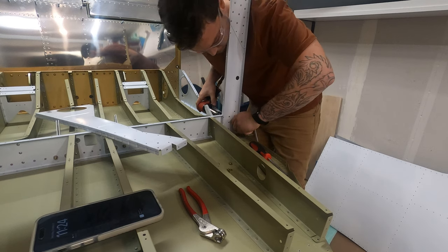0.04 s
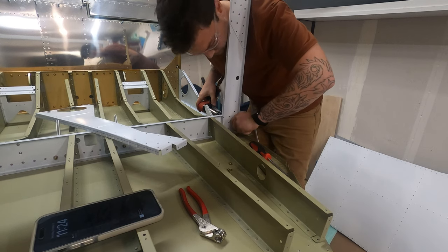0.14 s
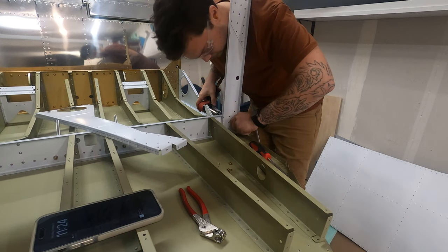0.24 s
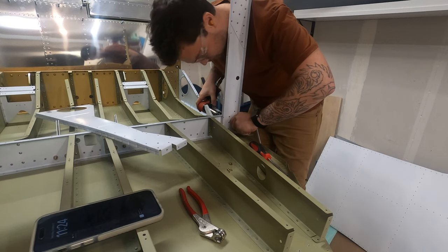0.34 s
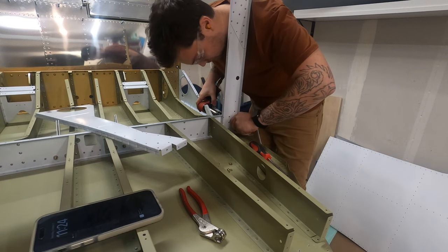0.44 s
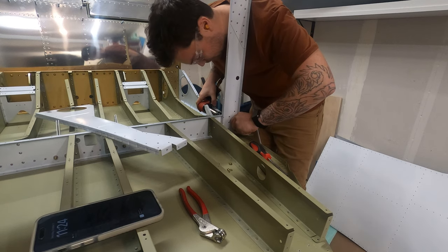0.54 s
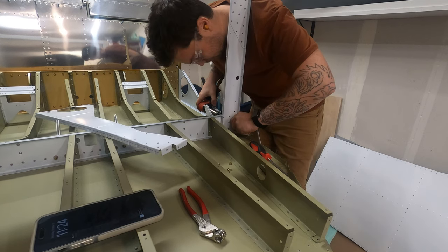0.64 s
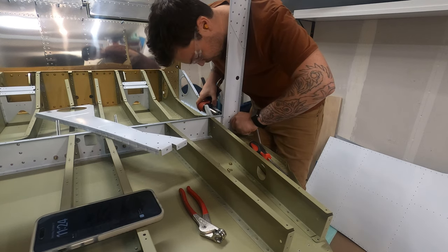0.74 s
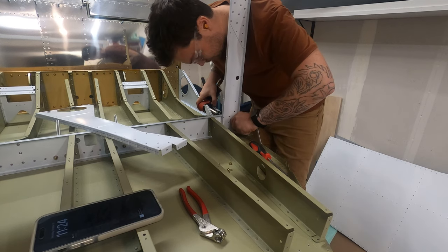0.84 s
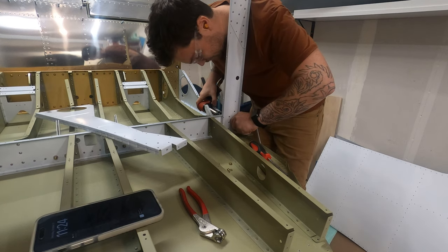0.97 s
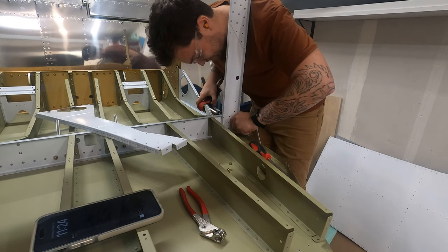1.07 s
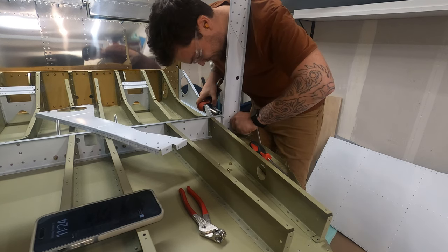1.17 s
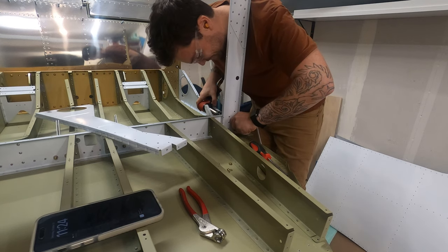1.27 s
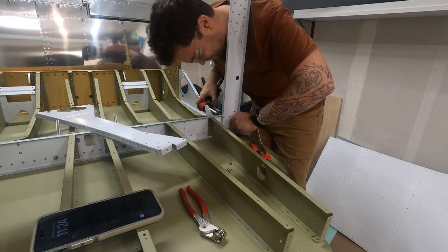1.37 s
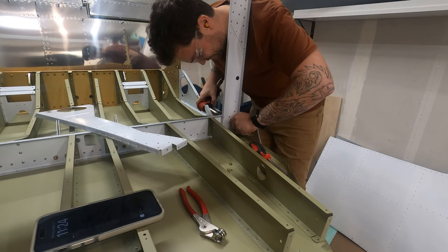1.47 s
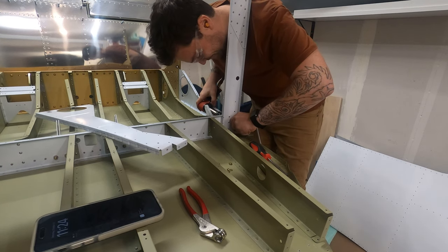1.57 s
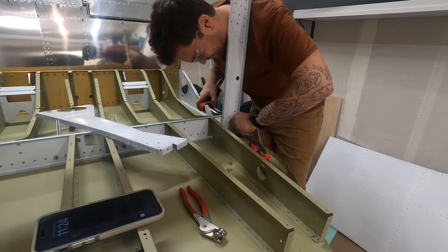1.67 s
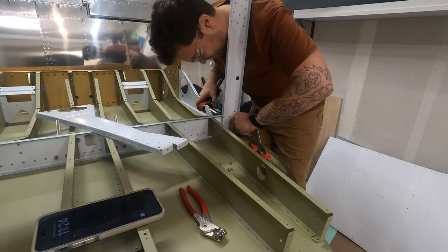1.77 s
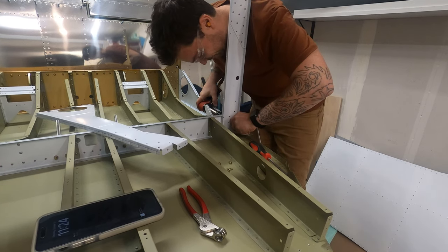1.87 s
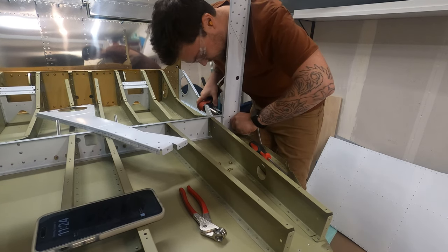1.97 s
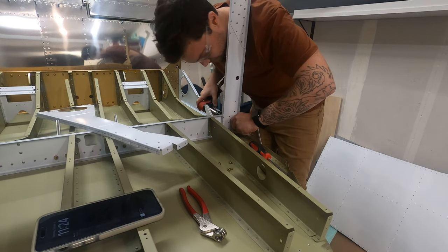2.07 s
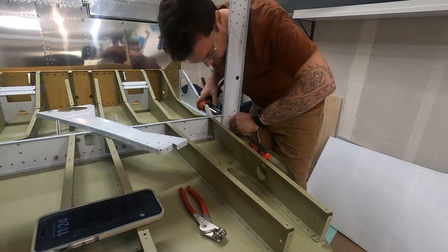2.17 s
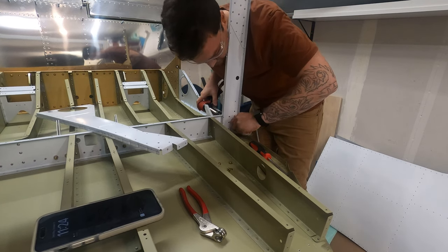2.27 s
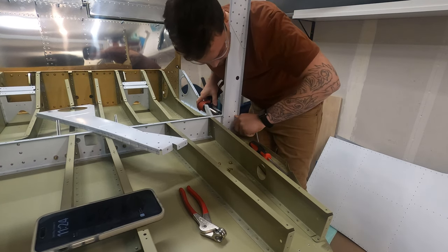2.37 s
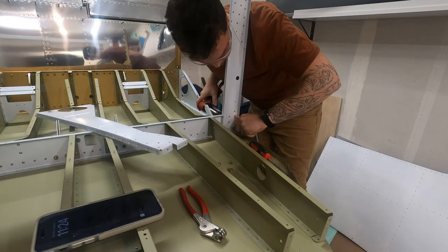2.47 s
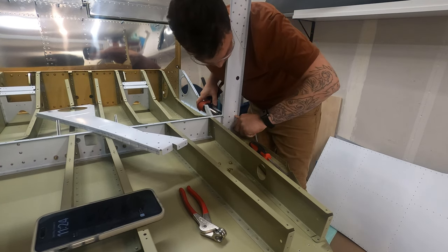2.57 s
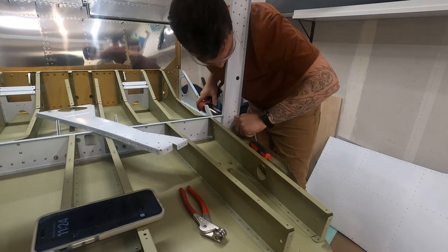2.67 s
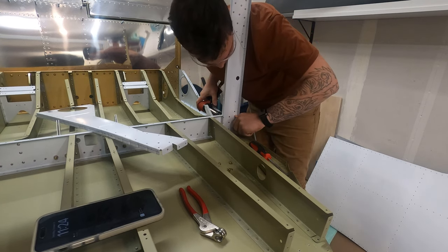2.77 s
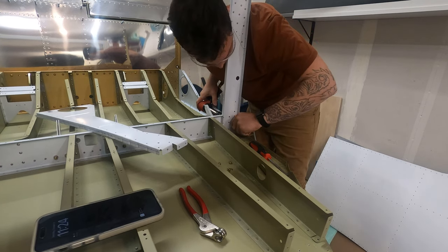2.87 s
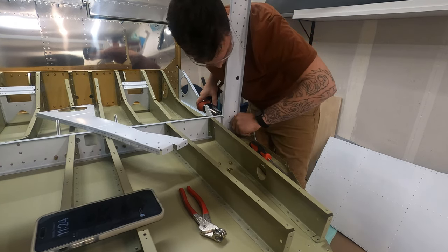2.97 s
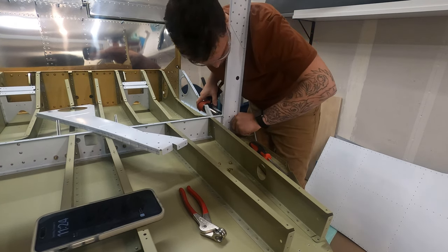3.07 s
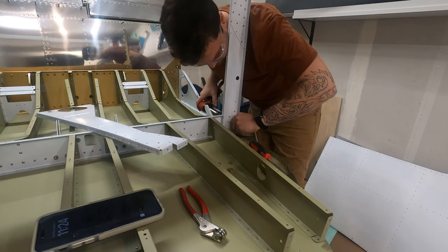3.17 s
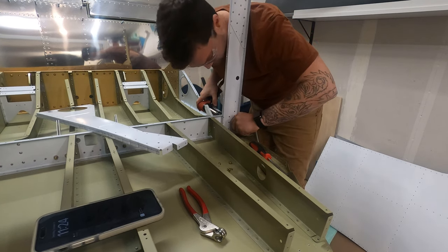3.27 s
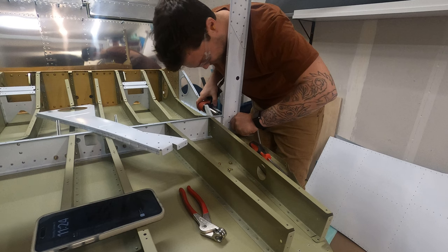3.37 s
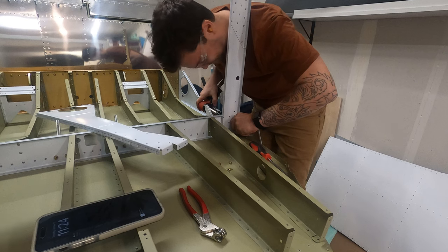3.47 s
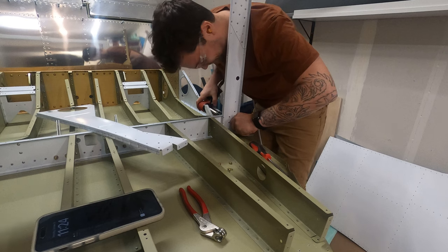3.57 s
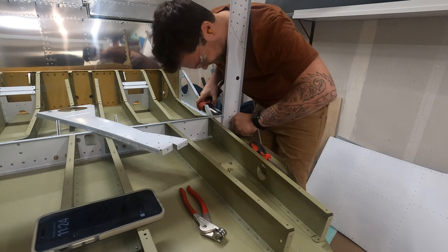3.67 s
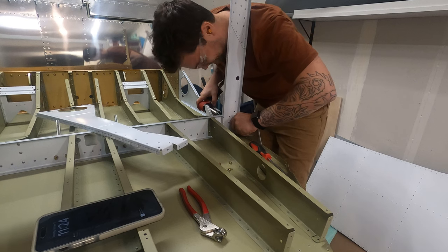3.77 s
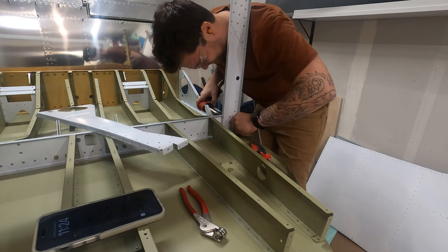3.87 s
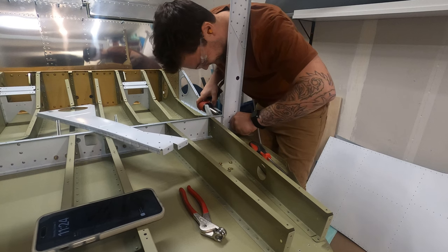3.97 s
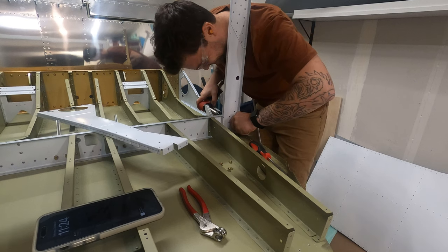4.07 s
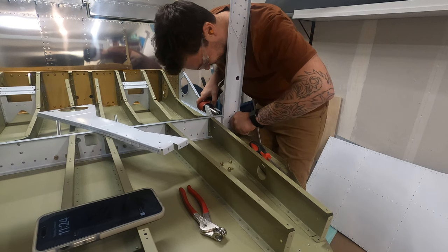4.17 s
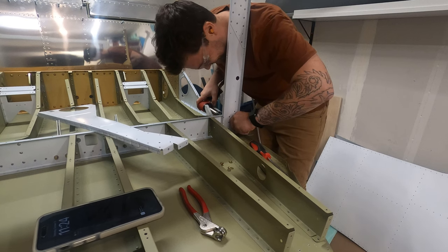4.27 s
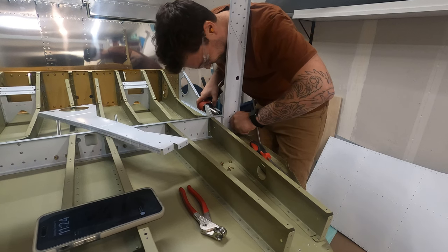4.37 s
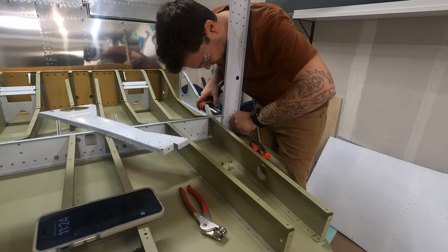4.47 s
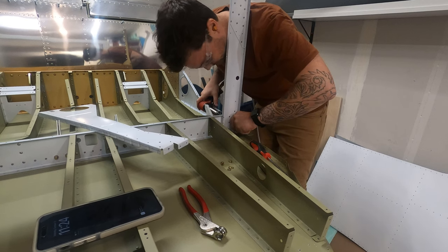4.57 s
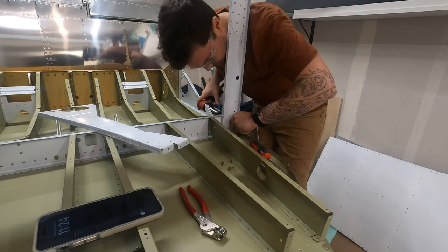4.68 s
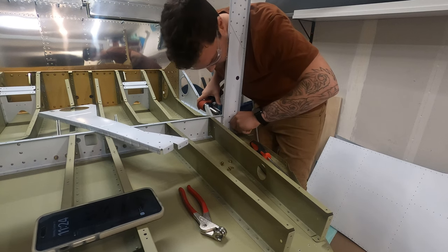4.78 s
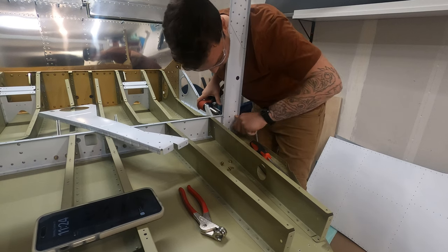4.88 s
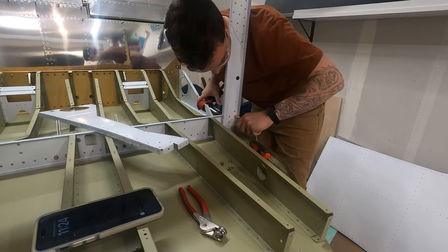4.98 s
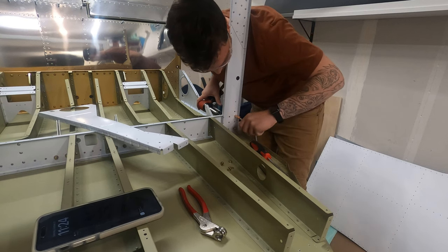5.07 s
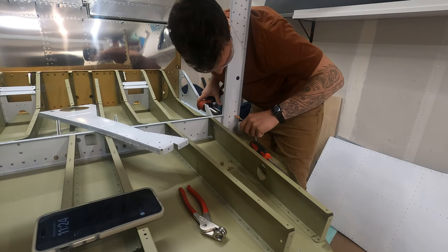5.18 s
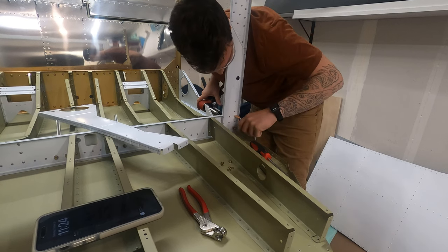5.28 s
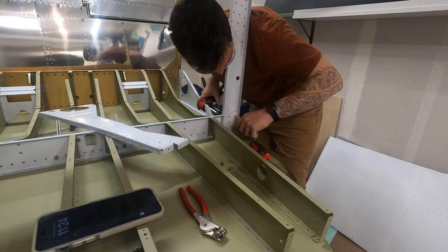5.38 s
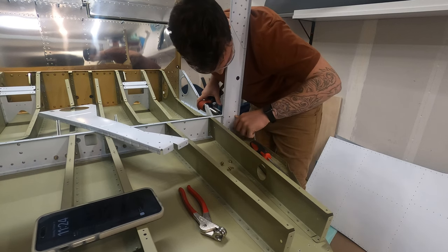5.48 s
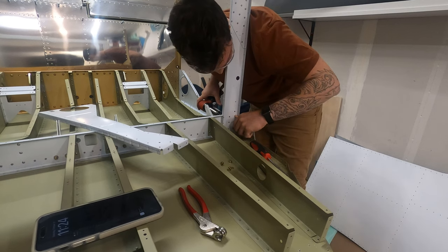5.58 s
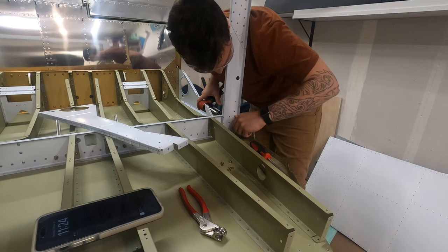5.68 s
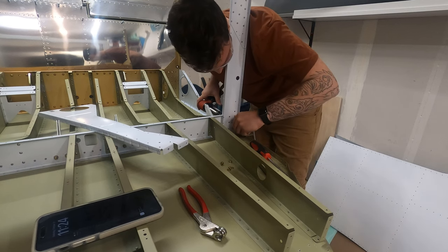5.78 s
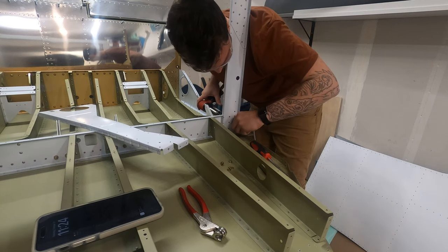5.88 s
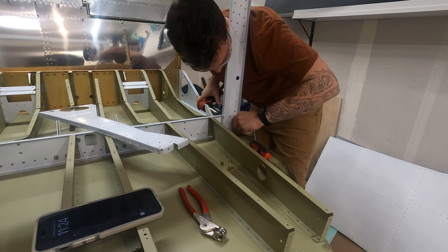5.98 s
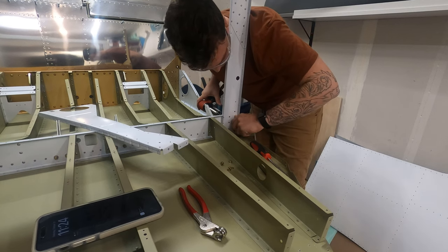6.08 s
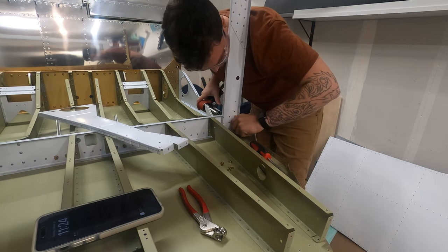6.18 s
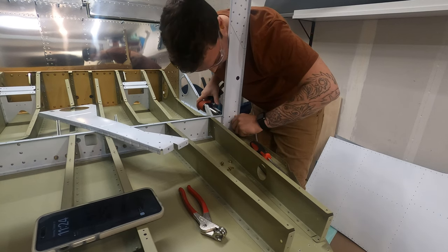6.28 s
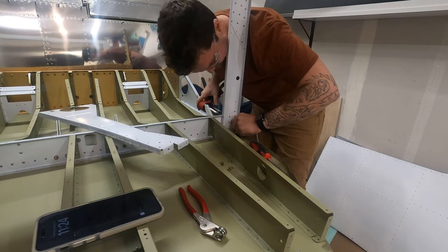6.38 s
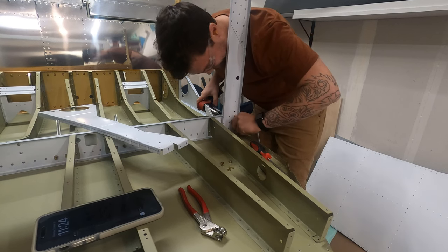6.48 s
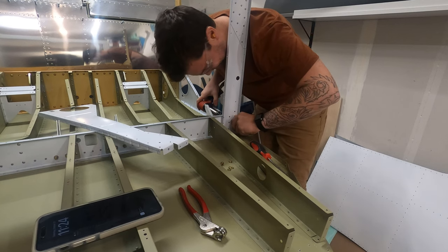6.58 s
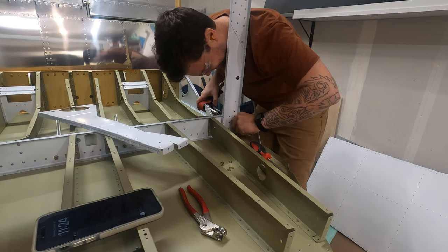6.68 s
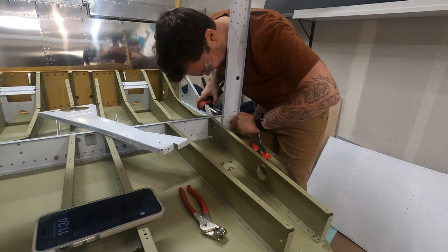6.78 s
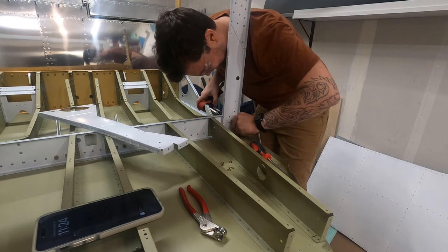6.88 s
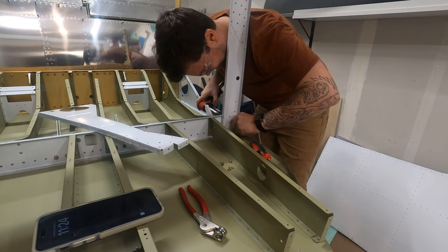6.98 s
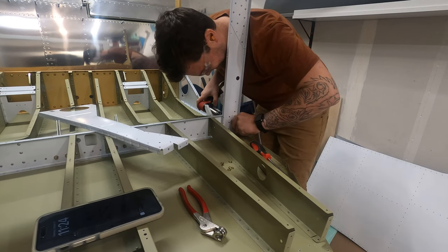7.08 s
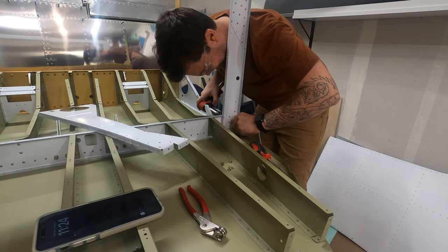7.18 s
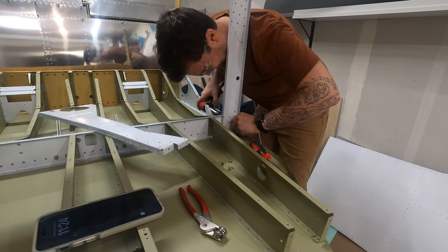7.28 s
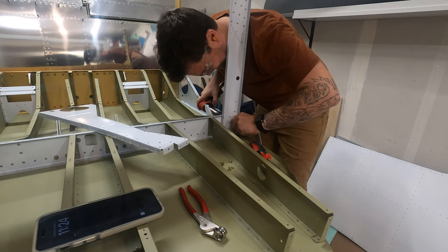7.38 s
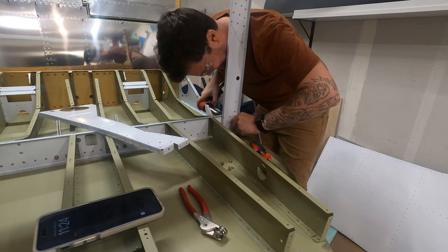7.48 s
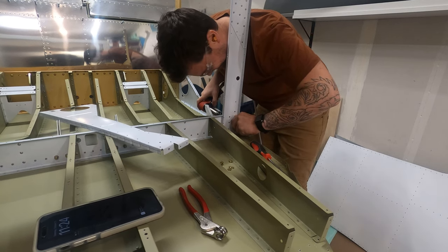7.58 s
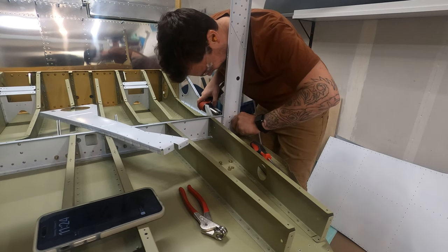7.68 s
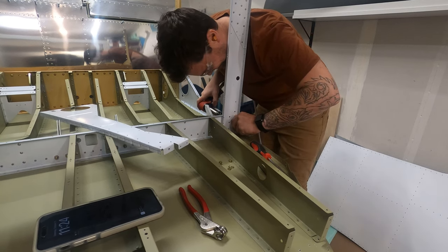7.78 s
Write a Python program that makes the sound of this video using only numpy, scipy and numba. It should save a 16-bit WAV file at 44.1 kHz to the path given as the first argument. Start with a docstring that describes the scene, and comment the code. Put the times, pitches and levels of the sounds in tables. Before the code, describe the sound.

In a small, quiet workshop, faint tool taps and scraping on sheet metal lead to a short, violent burst from a pneumatic rivet gun. A sharp clank and rattle follow, then a longer burst, its ring fading slowly. More light scrapes and clanks come before a whistling air leak swells into a third burst. Close stereo microphone, with the loud blows compressed and the ring swelling back.

```python
"""Rivet gun on an aluminium airframe

A pneumatic rivet gun hammers a ringing shell in three short bursts in a small workshop.
Around the bursts, gun and bucking bar slide, bump and land on the metal: each contact is a force
that is convolved with the shell's impulse response. Shaped noise makes the room and the inlet air hiss
before each burst, narrow resonances a whistle before the last. The gun's beat slows a little in a burst.
A limiter holds the bursts down and lets their ring swell back up."""
import sys
import numpy as np
from scipy import signal
from scipy.fft import rfft, irfft
from scipy.io import wavfile
from scipy.ndimage import uniform_filter1d
from numba import njit

SR = 44100
rng = np.random.default_rng(int(sys.argv[2]) if len(sys.argv) > 2 else 0)


def dump(signal):
    """Clip the signal to [-1, 1] and save it as 16-bit WAV at the path in sys.argv[1]."""
    limited = np.clip(np.atleast_2d(signal).T, -1, 1)
    pcm = np.round(limited * 32767).astype(np.int16)
    wavfile.write(sys.argv[1], SR, pcm)


N = 345726
RING_N, BLOW_N = 2 * SR, 2048  # samples of an impulse response and of a single contact

# Spectrum of the still workshop. Each row: frequency in Hz, relative density in dB per Hz.
SHOP_COLOUR = [(70, -6), (100, -11.5), (165, 1.5), (240, -5), (330, -11), (700, -17), (1500, -16),
               (2200, -23.5), (3500, -36), (6000, -41.5), (10000, -52), (15000, -75)]
# Ratio of side to mid, which widens the sound in the treble. Each row: frequency in Hz, side minus mid in dB.
WIDTH = [(60, -8), (200, -14), (700, -11), (1300, -8.5), (2400, -6), (4400, -3), (8100, -1.5), (15000, -1)]
# Scaling of the stereo difference over time. Each row: time in seconds, side gain in dB.
SPREAD = [(4.0, 0.5), (4.5, -12.5), (4.897, -37), (6.6, -49.5), (7.05, -12.5)]

# Resonances of the leaking valve before they bend. Each row: frequency in Hz, relative level in dB.
WHISTLE_TONES = [(900, 16.5), (2640, 8), (5590, 1)]
WHISTLE_S, WHISTLE_RISE_S = 0.45, 0.29  # start ahead of the last burst, time constant of its build-up
WHISTLE_BEND, WHISTLE_BEND_S = 0.203, 0.0308  # upward bend as a share of pitch, its e-fold time
AIR_RISE_S, AIR_CUT_S = 0.01, .003  # e-fold times of inlet air before and after the first blow

# Tools sliding on the metal.
# Each row: start in seconds, end in seconds, relative level in dB, contact resonance in Hz.
SCRAPES = [(0, 0.337, -56, 3120), (2.366, 2.429, -62, 2993), (2.614, 2.659, -57.5, 2610),
           (2.878, 3.02, -70.5, 4000), (5.635, 5.951, -61.5, 4990), (5.956, 6.123, -56, 11580),
           (6.216, 6.264, -41.5, 7240), (6.381, 6.65, -57.5, 4520), (6.635, 6.697, -58.5, 7450)]
# Soft bumps against the panels. Each row: time in seconds, level in dB, contact resonance in Hz.
BUMPS = [(0.5, -52.5, 162.9), (0.532, -52, 210), (0.62, -53.5, 260), (.852, -36.5, 238), (.878, -47, 272),
         (0.953, -46.5, 239), (1.529, -49, 250), (1.6, -29.5, 272), (3.497, -43, 264), (5.04, -40, 272.6),
         (5.169, -44.5, 240), (6.65, -41.5, 500), (6.655, -47.5, 344), (6.744, -58, 352)]
BUMP_Q, BUMP_BASS_DB = 3.3, -0.5
# Light clicks of steel on aluminium. Each row: time in seconds, level in dB, contact resonance in Hz.
CLICKS = [(3.483, -61, 3500), (5.251, -63, 5000), (5.944, -46, 5000)]
# Trigger valve inside the gun. Each row: time in seconds, level in dB, contact resonance in Hz.
CLACKS = [(1.599, -15.5, 11000), (1.607, -20.5, 2400), (3.844, -35.5, 11000), (3.866, -30.5, 3200)]
CLICK_Q, CLICK_BASS_DB, CLICK_LOW_HZ = 0.59, -21.5, 824
# Gun and bar set down on the shell. Each row: time in seconds, level in dB, contact resonance in Hz,
# bass in dB, share of the bar's ring against the ribs' from 0 to 1.
CLANKS = [(.004, -50.5, 3250, 8.5, 0.65), (.162, -42.5, 3700, -1.5, 1), (2.416, -56, 3300, 3.5, 0.98),
          (2.628, -57.5, 2886, -2, 0.6), (3.022, -25, 3400, -1, .1), (3.072, -35.5, 1300, 0.5, .1),
          (3.128, -39, 1100, 2.5, 0.12), (5.631, -61, 3185, 5.5, .8), (5.971, -23, 2300, 6, 0),
          (6.209, -40, 2630, 8.5, 0.5), (6.238, -39.5, 4170, 12, 0.53), (6.254, -45, 5500, 10.5, 0.5),
          (6.648, -46.5, 4500, -4.5, .95)]
CLANK_Q = 0.64
# Mean lag between landings, level of the second landing, step to each later one, their lower limit.
TIP_S, TIP_DB, RATTLE_STEP_DB, RATTLE_LOW_HZ = .010, -6.5, -8, 453

# Resonances of the hand-held bucking bar and gaps between them.
# Each row: frequency in Hz, width in Hz, gain in dB.
BAR = [(1190, 100, 4), (1500, 90, 2), (1770, 120, 7), (2020, 200, -8), (2260, 80, 3), (2430, 150, -5),
       (2720, 200, 4), (3650, 120, 4), (3970, 130, 2), (5730, 200, -6), (6150, 220, 7), (8900, 300, 6)]
# Resonances and a gap of the gun's body. Each row: frequency in Hz, width in Hz, gain in dB.
GUN_BODY = [(1151, 80, 9.5), (1750, 420, 5), (3000, 61, 4), (4900, 2500, -6), (5850, 120, 3.5)]
# Clusters of modes in the riveted metal and gaps between them.
# Each row: frequency in Hz, width in Hz, gain in dB.
METAL_PEAKS = [(176, 22, 4), (205, 20, -3), (330, 40, -5), (635, 60, -3), (715, 40, 5), (812, 35, 4),
               (865, 60, -6), (970, 80, 3), (1165, 90, 4), (1510, 70, 3), (1980, 130, 3), (2420, 100, -4),
               (2660, 70, -5), (2760, 140, 3), (3140, 100, 3), (3910, 90, 4), (5730, 120, 6),
               (6600, 130, 6), (6980, 110, 5), (8050, 450, -8), (8540, 200, 6), (8950, 200, 4),
               (11100, 600, -4)]
# Panel modes of the shell. Each row: frequency in Hz, level in dB, T60 in seconds.
SHELL_MODES = [(101.1, -41, 1.8), (130, -19.5, 0.52), (162.5, -18, 1.1), (175.3, -9, 0.44),
               (236.1, -13.5, 0.8), (283.4, -12, 0.56), (383, -21, .5), (424, -26, .35), (718, -18, 0.5),
               (812, -22, .45), (1160, -19.5, .35)]
# Modes of the ribs that the tools land on. Each row: frequency in Hz, level in dB, T60 in seconds.
RIB_MODES = [(619, -17, .55), (730, -13, .42), (896, -13, .4), (1040, -17, .3), (1503, -13, .33),
             (1850, -16, .25), (2000, -16, .25), (2155, -13, .33), (2335, -7, .28), (2400, -13, .2),
             (2590, -18, .28), (2920, -18, .3), (3330, -17, .35)]
# Rivet set and bucking bar ringing against each other.
# Each row: frequency in Hz, relative level in dB, T60 in seconds.
STEEL_MODES = [(980, -23, .2), (1158, -21, .2), (1513, -21, .2), (1715, -22, .15), (1950, -20, .15),
               (2019, -19, .2), (2285, -20, .15), (2560, -19, .2), (2725, -19, .2), (3160, -18, .12),
               (3420, -18, .12), (3925, -21, .15), (5105, -27, .15), (6622, -24, .15)]
# Close pair of modes that outlasts the rest. Each row: frequency in Hz, level gained per blow in dB.
AFTER_TONE = [(738, -78), (742.8, -70)]
AFTER_T60_S = 4.6
# Spectrum of the dense ring of shell and room. Each row: frequency in Hz, relative density in dB per Hz.
RING_COLOUR = [(40, -35), (90, -4.5), (170, 6), (300, 3), (500, -3.5), (1100, -7.5), (2200, -6.5),
               (3500, -9), (6000, -16.5), (9500, -20.5), (11000, -23), (16000, -33.5)]
# Decay of that ring. Each row: frequency in Hz, T60 in seconds.
RING_T60 = [(100, 0.69), (300, 0.68), (1000, 0.58), (3000, 0.49), (7000, 0.43), (15000, 0.35)]
# Spectrum of the crack of the struck spot. Each row: frequency in Hz, relative density in dB per Hz.
CRACK_COLOUR = [(200, -6.5), (1000, -3), (3000, 4.5), (6500, 0.5), (9500, -2.5), (11500, -9),
                (16000, -15.5)]

# Trigger pulls. Each row: first blow in seconds, piston comes to rest in seconds,
# first interval shortened by in seconds, blow in dB, exhaust relative to the blow in dB,
# lead stroke in dB, clatter in dB, inlet air in dB, inlet air resonance in Hz.
BURSTS = [(1.685, 1.969, 0.0014, -0.5, 5.5, -14.5, 8, -27, 9000),
          (3.8967, 4.599, 0.00027, -2.5, 5, -15.5, -0.5, -19.5, 8950),
          (7.523, 7.95, .0038, -4, -1.5, -22, -4, -17, 7400)]
# Drift of the blow's chatter as the rivet flattens. Each row: frequency in Hz, change in dB per second.
SETTING_TILT = [(500, 9), (1500, 8), (3000, -3), (8000, 2.5)]
# Interval between blows at first and in the end, and the time constant between them.
FIRST_PERIOD_S, SET_PERIOD_S, SETTING_S = .0383, .0402, .235
# A dull stroke leads each burst; after the last blow the piston coasts and drops home with a click.
LEAD_S, COAST_S = .0155, .06
LEAD_HZ, LEAD_Q, LEAD_BASS_DB = 1500, 0.95, -2
REST_DB, REST_HZ, REST_BASS_DB = -7, 12400, -14.5
REBOUND_S = .005  # delay from each blow to the bar's landing


def undb(db):
    """A level in decibels is twenty times the logarithm of amplitude; return the amplitude."""
    return 10 ** (np.asarray(db) / 20)


def unit(x):
    """Root-mean-square normalisation sets the mean power to one."""
    return x / np.sqrt(np.mean(x ** 2))


def freqs(count):
    """Bin frequencies of a real spectrum, kept above zero for the logarithm."""
    return np.maximum(np.fft.rfftfreq(count, 1 / SR), 1)


def along(hz, table):
    """Interpolation of a spectral curve on a logarithmic frequency axis."""
    f, value = np.transpose(table)
    return np.interp(np.log(hz), np.log(f), value)


def filt(x, hz, kind, order=2):
    """Butterworth low-pass or high-pass: a maximally flat passband."""
    sections = signal.butter(order, min(hz, SR / 2 - 1), kind, fs=SR, output="sos")
    return signal.sosfilt(sections, x)


def add(track, s, sound):
    """Superposition: a sound joins a track at a time in seconds."""
    i = int(np.clip(s * SR, 0, N))
    track[i:i + len(sound)] += sound[:N - i]


def decay(t, t60):
    """Exponential decay: amplitude falls by 60 dB in the time T60."""
    return np.exp(-np.log(1000) * t / t60)


def opposite():
    """Opposite signs for the two channels, in a random order."""
    return rng.choice([-1, 1]) * np.array([[1], [-1]])


def stereo_noise(count, colour):
    """Partly correlated noise: independent mid and side spectra, with more side in the treble."""
    hz = freqs(count)
    mid, side = rfft(rng.standard_normal((2, count))) * undb(along(hz, colour))
    side = side * undb(along(hz, WIDTH))
    return unit(irfft([mid + side, mid - side], count))


def resonate(x, table, depth=1):
    """Resonance: second-order peaks in series raise or lower narrow bands."""
    for hz, width, db in table:
        peak = signal.lfilter(*signal.iirpeak(hz, hz / width, fs=SR), x)
        x = x + (undb(depth * db) - 1) * peak
    return x


def soften(x, hz, q=0.41):
    """Mass on a spring: a contact passes force up to its resonance and loses the treble above."""
    w = 2 * np.tan(np.pi * min(hz / SR, .45))  # prewarped for the bilinear transform
    return signal.lfilter(*signal.bilinear([w * w], [1, w / q, w * w]), x)


def knock(db, bright_hz, q, bass_db, bass_hz=500, order=1):
    """Impact force: a softer contact gives a duller impulse, and the bass sets how the panels are moved."""
    push = soften(signal.unit_impulse(BLOW_N), bright_hz, q)
    upper = filt(push, bass_hz, "high", order=order)
    return undb(db) * (upper + undb(bass_db) * (push - upper))


def workshop(shop_db=-59, waver_db=1, rumble_db=-50, rumble_hz=17):
    """Stationary noise: a deep rumble and a faint hiss whose level wavers slowly."""
    waver = np.interp(np.arange(N), np.linspace(0, N, 30), rng.standard_normal(30))
    rumble_colour = [(11, -25), (rumble_hz, 0), (23, -14), (36, -18), (65, -34), (200, -80)]
    rumble = stereo_noise(N, rumble_colour) * undb(rumble_db)
    hiss = stereo_noise(N, SHOP_COLOUR) * undb(shop_db + waver_db * waver)
    return rumble + hiss


def trigger_whistle(whistle_db=-63, width_hz=170, swell_db=20, swell_s=0.1):
    """Flow resonance: the half-pressed trigger leaks, and its whistle climbs and swells to the last burst."""
    early = BURSTS[-1][0] - np.arange(N) / SR
    ahead = np.maximum(early, 0)
    opening = np.exp(-ahead / WHISTLE_BEND_S)
    tones = sum(undb(db) / (1 + (2 * (freqs(N) - f) / width_hz) ** 2) for f, db in WHISTLE_TONES)
    steady = unit(irfft(rfft(rng.standard_normal(N)) * tones, N))
    # reading the steady whistle faster bends it upwards
    bent = np.interp(np.cumsum(1 + WHISTLE_BEND * opening), np.arange(N), steady)
    leak = (1 - np.exp(-np.maximum(WHISTLE_S - early, 0) / WHISTLE_RISE_S)) * (early > 0)
    return bent * leak * undb(whistle_db + swell_db * np.exp(-ahead / swell_s))


def trigger_air(width_hz=1100, hiss_db=18):
    """Turbulent flow: a hiss swells as the valve opens, up to the first blow of each burst."""
    t = np.arange(N) / SR
    rush_colour = [(100, 1), (2800, 2.5), (5000, -7), (9000, -9.5), (11000, -14.5), (16000, -26)]
    rush = stereo_noise(N, rush_colour)
    out = 0
    for first, *_, air_db, air_hz in BURSTS:
        flow = np.exp(np.minimum((t - first) / AIR_RISE_S, (first - t) / AIR_CUT_S))
        hiss = unit(resonate(rush, [(air_hz, width_hz, hiss_db)]))
        out = out + undb(air_db) * flow * hiss
    return out


def scrapes(grain_db=4, low_hz=500, drag_db=-33):
    """Stick-slip friction: the sliding tool catches in tiny uneven slips, coloured by the bar."""
    force = np.zeros(N)
    for start, stop, db, bright_hz in SCRAPES:
        count = max(int((stop - start) * SR), BLOW_N)
        grain = undb(grain_db * np.minimum(rng.exponential(size=N), np.pi))
        slips = rng.standard_normal(N) * grain * (rng.random(N) < .02)  # sparse in time
        stroke = unit(slips[:count]) * signal.windows.tukey(count, .3)
        add(force, start, soften(stroke, bright_hz) * undb(db + drag_db))
    return resonate(filt(force, low_hz, "high", order=1), BAR)


def knocks():
    """Impacts of handling: soft bumps, light steel clicks and the trigger valve heard through the gun."""
    force = np.zeros(N)
    for s, db, hz in BUMPS:
        add(force, s, knock(db, hz, BUMP_Q, BUMP_BASS_DB))
    for s, db, hz in CLICKS:
        add(force, s, knock(db, hz, CLICK_Q, CLICK_BASS_DB, CLICK_LOW_HZ, order=4))
    for s, db, hz in CLACKS:
        clack = knock(db, hz, CLICK_Q, CLICK_BASS_DB, CLICK_LOW_HZ, order=4)
        add(force, s, resonate(clack, GUN_BODY))
    return force


def clanks():
    """Repeated impact: a tool lands on one edge, tips and rattles; returns force on shell and on ribs."""
    shell, ribs = np.zeros((2, N))
    for s, db, bright_hz, bass_db, bar in CLANKS:
        landing = resonate(knock(db, bright_hz, CLANK_Q, bass_db), BAR, bar)
        add(shell, s, landing)
        add(ribs, s, landing * (1 - bar))
        rattle = filt(landing, RATTLE_LOW_HZ, "high")  # later contacts hardly move the panels
        gaps = TIP_S * rng.uniform(.7, 1.3, size=4)
        for k, lag in enumerate(np.cumsum(gaps)):
            add(shell, s + lag, rattle * undb(TIP_DB + k * RATTLE_STEP_DB))
    return shell, ribs


def ringing(table):
    """Modal decay: damped standing waves, each a little out of phase between the two channels."""
    t = np.arange(RING_N) / SR
    modes = 0
    for f, db, t60 in table:
        skew = undb(along(f, WIDTH)) * opposite()  # radians
        modes = modes + undb(db) * np.sin(2 * np.pi * f * t + skew) * decay(t, t60)
    return modes


def even(ring):
    """A diffuse field favours no pitch: level chance spectral peaks; keep the first half of the response."""
    spectrum = rfft(ring)
    power = np.abs(spectrum.mean(axis=0)) ** 2
    broad, fine = (uniform_filter1d(uniform_filter1d(power, size=size), size=size) for size in (360, 70))
    levelled = irfft(spectrum * np.sqrt(np.abs(broad / fine)), RING_N)
    return levelled * (np.arange(RING_N) < RING_N // 2)


def airframe(ring_db=-1.5, build_s=0.00033, shimmer_db=-40, shimmer_t60=2.2, shimmer_hz=1500):
    """Impulse response: a dense ring of shell and room, a faint long shimmer and the panel modes."""
    t = np.arange(RING_N) / SR
    dense = rfft(stereo_noise(RING_N, RING_COLOUR)) * undb(ring_db)
    centres, t60s = np.transpose(RING_T60)
    ring = 0
    # overlapping bands, each with its own decay
    for share, t60 in zip(np.eye(len(centres)), t60s):
        band = along(freqs(RING_N), np.c_[centres, share])
        ring = ring + irfft(dense * band, RING_N) * decay(t, t60)
    shimmer = filt(stereo_noise(RING_N, RING_COLOUR), shimmer_hz, "low")
    shimmer = shimmer * undb(shimmer_db) * decay(t, shimmer_t60)
    response = resonate(even(ring), METAL_PEAKS) + shimmer - ringing(SHELL_MODES)
    return response * (1 - np.exp(-t / build_s))


def crack(force, crack_db=5.5, crack_s=0.0043, hard_hz=7000):
    """Near-field radiation: the struck spot bursts into bright noise as strong as the contact is hard."""
    hardness = filt(force, hard_hz, "high") ** 2 + 1e-18
    energy = signal.lfilter([1], [1, -np.exp(-2 / (crack_s * SR))], hardness)
    noise = unit(resonate(stereo_noise(N, CRACK_COLOUR), METAL_PEAKS))
    return np.sqrt(energy) * noise * undb(crack_db)


def blow_times(first, rest, short):
    """Relaxing period: a shortened first interval, then a beat that slows until the air is shut off."""
    times, s = [first], first - short
    while True:
        s += SET_PERIOD_S + (FIRST_PERIOD_S - SET_PERIOD_S) * np.exp((first - s) / SETTING_S)
        if s >= rest - COAST_S:
            return times
        times.append(s)


def after_tone():
    """Light damping: a panel's pair of modes gains with every blow and sings on after the burst."""
    t = np.arange(N) / SR
    blows = np.zeros(N)
    for first, rest, short, *_ in BURSTS:
        for s in blow_times(first, rest, short):
            add(blows, s, np.ones(1))
    swing = signal.lfilter([1], [1, -decay(1 / SR, AFTER_T60_S)], blows)
    return swing * sum(undb(db) * np.sin(2 * np.pi * f * t) for f, db in AFTER_TONE)


def clatter(scatter_db=6.0):
    """Modal excitation: the rebounding bar lands anew, so each steel mode takes a new strength and phase."""
    landings = []
    for first, rest, short, _, _, _, clatter_db, *_ in BURSTS:
        landings += [(s + REBOUND_S, clatter_db) for s in blow_times(first, rest, short)]
    times, levels = np.transpose(landings)
    at = np.minimum((times * SR).astype(int), N - 1)
    out = 0
    for hz, db, t60 in STEEL_MODES:
        strength, turn = rng.standard_normal((64, 2))[:len(at)].T
        kicks = np.zeros(N, complex) + 1e-18
        kicks[at] = undb(levels + db + scatter_db * np.tanh(strength)) * np.exp(2j * np.pi * turn)
        # a complex pole is a decaying rotation
        pole = np.exp((2j * np.pi * hz - np.log(1000) / t60) / SR)
        swing = signal.lfilter([1], [1, -pole], kicks)
        skew = undb(along(hz, WIDTH)) * opposite()
        out = out + np.imag(swing * np.exp(1j * skew))
    return out


def contact(seat, age_s, chatter_s=0.0028, split_hz=520, fresh=0.9):
    """Force of a blow: a low push, and chatter that shares the tool's seat and excites all pitches evenly."""
    t = np.arange(BLOW_N) / SR
    chatter = (seat + fresh * rng.standard_normal(BLOW_N)) * np.exp(-t / chatter_s)
    colour = undb(age_s * along(freqs(BLOW_N), SETTING_TILT))
    fade = np.exp(-(t / (4 * chatter_s)) ** 4)
    # alternate between the wanted spectrum and a short duration
    for _ in range(4):
        phase = np.angle(rfft(chatter))
        chatter = irfft(colour * np.exp(1j * phase)) * fade
    push = filt(signal.unit_impulse(BLOW_N), split_hz, "low")
    return push + filt(chatter, split_hz, "high")


def rivet_gun(scatter_db=0.35, puff_db=5, puff_s=0.0014, puff_lag_s=0.0059, recoil_db=-4.0,
              recoil_s=0.0071, puff_scatter_db=3.5, lag_scatter_s=0.0011):
    """Driven impacts: returns the force of the piston blows and the low puff of exhaust and recoil."""
    force, exhaust = np.zeros((2, N))
    t = np.arange(BLOW_N) / SR
    recoil = undb(recoil_db) * np.e * t / recoil_s * np.exp(-t / recoil_s)
    for first, rest, short, db, exhaust_db, lead_db, *_ in BURSTS:
        lead = knock(lead_db, LEAD_HZ, LEAD_Q, LEAD_BASS_DB)
        add(force, first - LEAD_S, resonate(lead, GUN_BODY))
        seat = rng.standard_normal(BLOW_N)
        for s in blow_times(first, rest, short):
            strength, air, heave, lag = rng.standard_normal(4)
            u = (t - puff_lag_s - lag_scatter_s * lag) / puff_s
            # a puff radiates the slope of its flow; the recoil heaves the whole panel more slowly
            puff = undb(puff_db + puff_scatter_db * air) * u * np.exp(-u ** 2 / 2)
            heaved = recoil * undb(puff_scatter_db * heave)
            add(force, s, contact(seat, s - first) * undb(db + scatter_db * strength))
            add(exhaust, s, (puff - heaved) * undb(db + exhaust_db))
        add(force, rest, knock(REST_DB, REST_HZ, CLICK_Q, REST_BASS_DB))
    return force, filt(exhaust, 39, "high")


def scene(exhaust_pan_db=-5):
    """Linear superposition: all contacts ring the shell, clanks also the ribs; air and room add directly."""
    ring, room, air = airframe(), workshop(), trigger_air() + trigger_whistle()
    blows, exhaust = rivet_gun()
    tools, on_ribs = clanks()
    force = blows + knocks() + tools + scrapes()
    shell = signal.fftconvolve(force[None], ring, axes=1)[:, :N]
    ribs = signal.fftconvolve(on_ribs[None], ringing(RIB_MODES), axes=1)[:, :N]
    pan = undb(exhaust_pan_db * np.array([[.5], [-.5]]))
    metal = shell + ribs + clatter() + after_tone() + crack(force)
    return metal + exhaust * pan + air + room


@njit
def follow(x, attack, release):
    """Envelope following: one-pole smoothing with separate coefficients for rise and fall."""
    out, e = np.empty(len(x)), 0.
    for i in range(len(x)):
        e += (x[i] - e) * (attack if x[i] > e else release)
        out[i] = e
    return out


def narrow(x):
    """Mid-side scaling: the image closes to the centre for a while, then partly reopens."""
    mid = x.mean(axis=0)
    return mid + (x - mid) * undb(np.interp(np.arange(N) / SR, *np.transpose(SPREAD)))


def record(dry, ceiling_db=-6.0, attack_s=0.0014, release_s=0.14, knee=3, held_share=0.77,
           held_s=0.24, round_at=.85, top_hz=15900):
    """Gain reduction: a limiter ducks the bursts and recovers in their ring; peaks round, the top is cut."""
    loud = follow(np.abs(dry).max(axis=0), 1 / (attack_s * SR), 1 / (release_s * SR))
    duck_db = 20 / knee * np.log10(1 + (loud / undb(ceiling_db)) ** knee)
    # a slower follower holds part of the ducking for longer
    held_db = held_share * follow(duck_db, 1 / (release_s * SR), 1 / (held_s * SR))
    wet = narrow(dry) * undb(-np.maximum(duck_db, held_db))
    rounded = round_at * np.tanh(wet / round_at)
    return signal.sosfilt(signal.ellip(10, .2, 80, top_hz, fs=SR, output="sos"), rounded)


dry = scene()
out = record(dry)
dump(out)
```